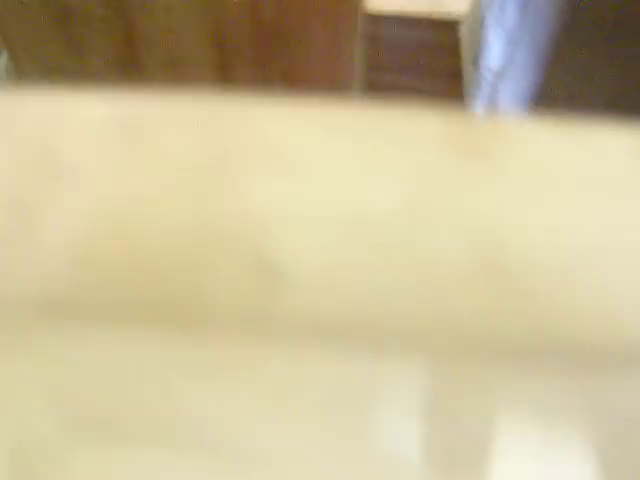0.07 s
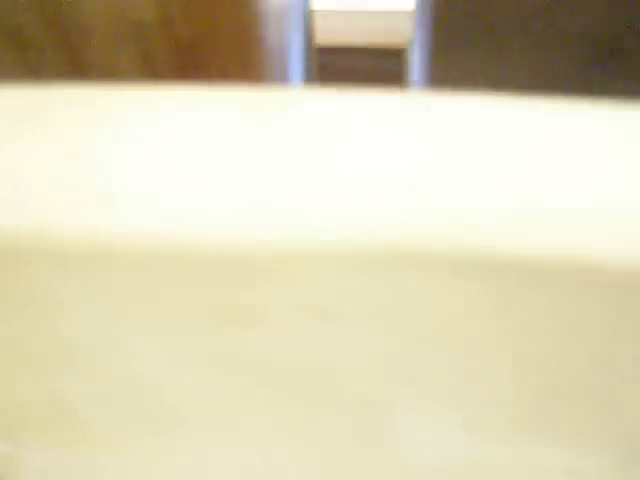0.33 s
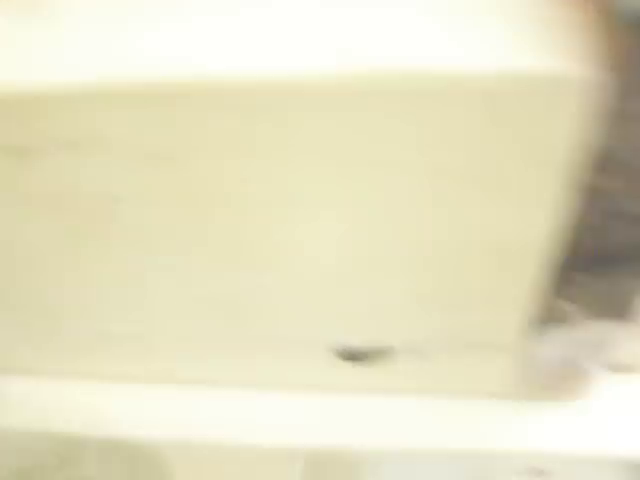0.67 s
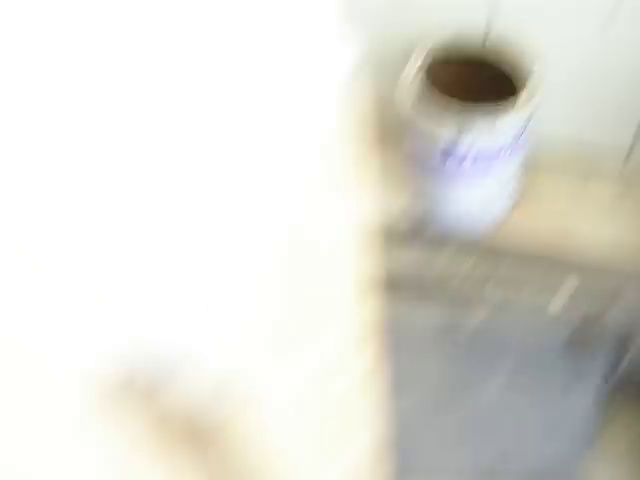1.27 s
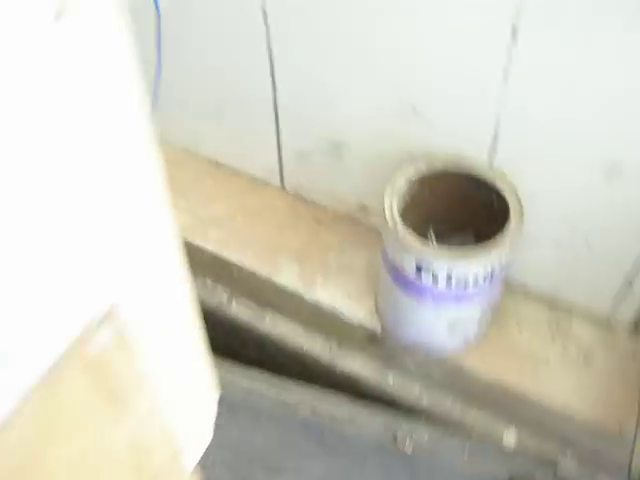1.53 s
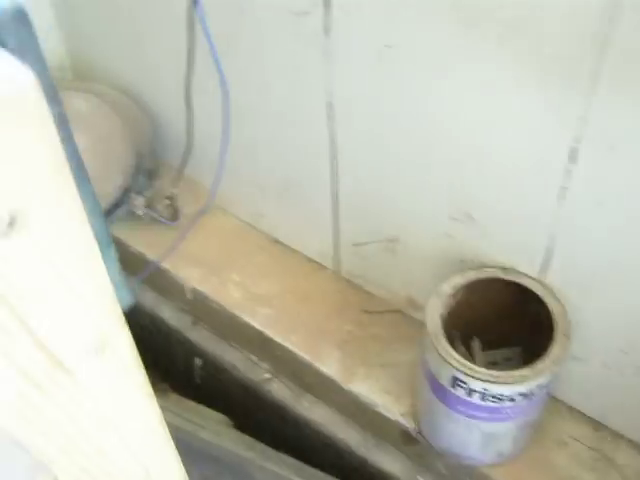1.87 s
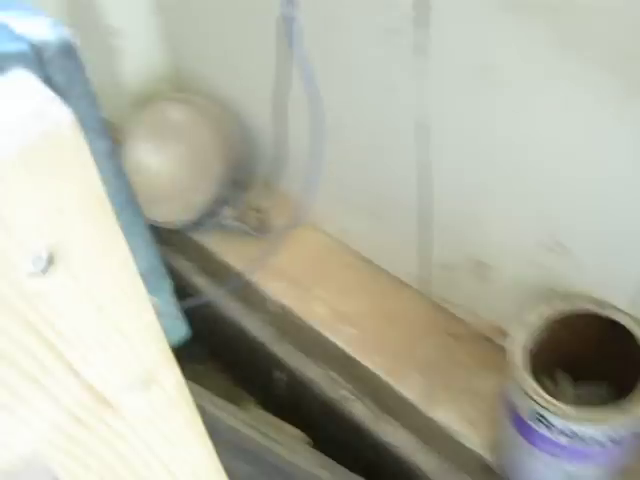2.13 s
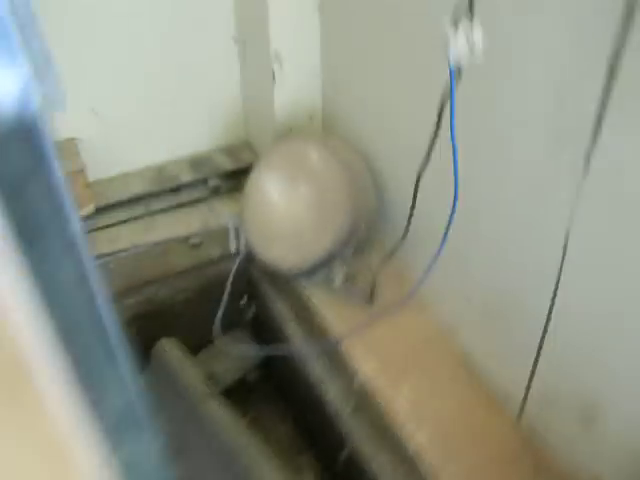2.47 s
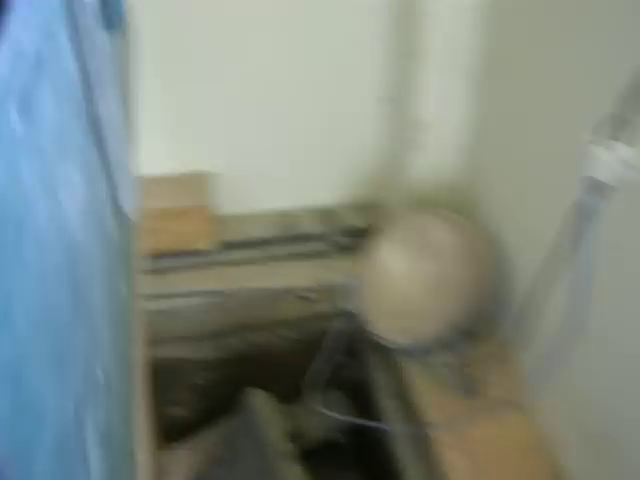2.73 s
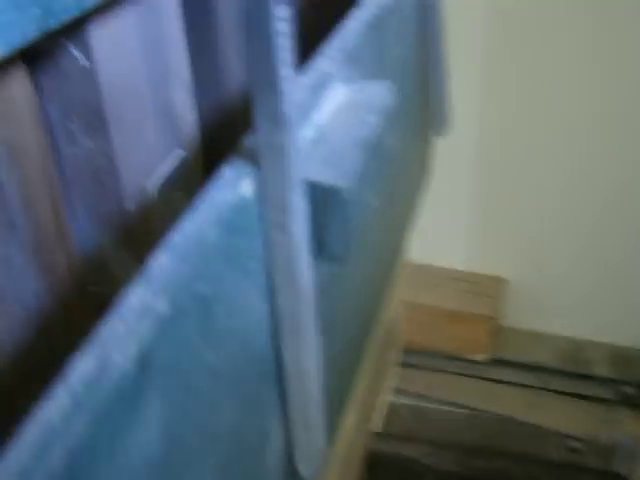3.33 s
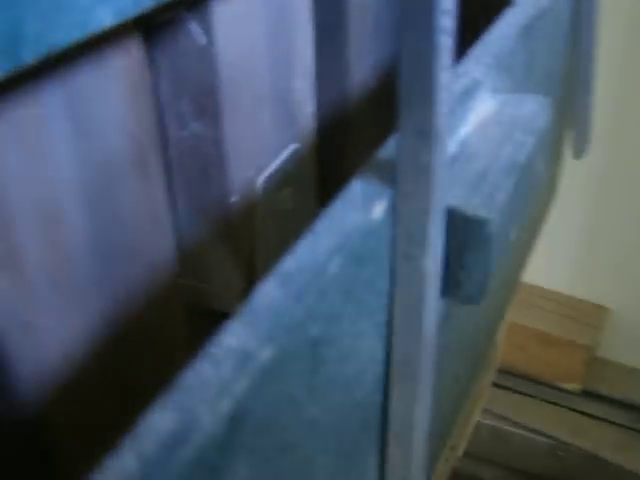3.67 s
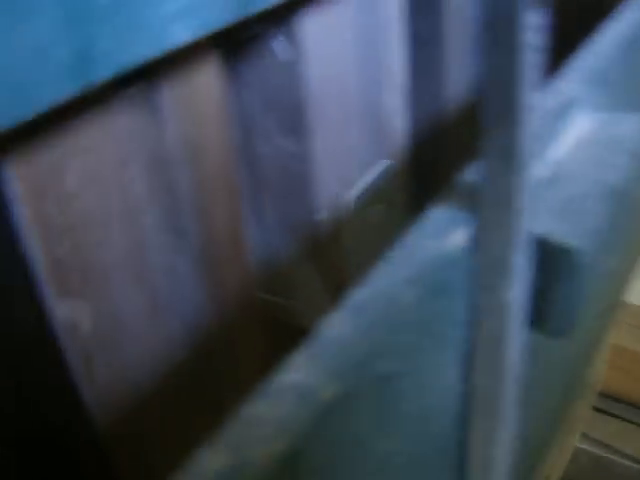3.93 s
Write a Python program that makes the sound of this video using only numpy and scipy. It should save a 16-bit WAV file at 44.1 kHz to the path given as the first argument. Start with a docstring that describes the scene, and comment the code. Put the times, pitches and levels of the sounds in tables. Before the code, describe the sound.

Running mill machinery knocks hard about twice a second over a swelling rumble and low drone. Loose parts clack, a catch snaps and a hollow part clonks. Plank walls answer briefly, and the hardest knocks overload a dull microphone.

```python
"""A small wooden room with mill machinery running. Gearing rumbles and rattles through the timber frame,
swelling with each turn; the frame drones. A wooden part knocks hard about twice a second, and loose parts clack
in between. About once a turn a catch snaps and a hollow part clonks; early on, the hollow part's clear mode
rings on at length. Plank walls answer the blows. The microphone is dull and the hardest knocks overload it."""
import sys
import numpy as np
from scipy import signal
from scipy.fft import rfft, irfft, next_fast_len
from scipy.io import wavfile
from scipy.ndimage import map_coordinates

SR = 44100
rng = np.random.default_rng(int(sys.argv[2]) if len(sys.argv) > 2 else 0)


def put_to_file(sound):
    """Save the sound as 16-bit audio at rate SR, in the file named by the first command-line argument."""
    columns = np.atleast_2d(sound).T  # one column per channel
    safe = np.clip(columns, -1, 1)
    whole_steps = np.round(safe * 32767)
    wavfile.write(sys.argv[1], SR, whole_steps.astype(np.int16))


N = 176400

# Gearing level and drone trim. Each row: time in seconds, level in dB.
GEAR_LEVEL_DB = [(0, -24), (.145, -25.5), (.18, -22), (.31, -19.5), (.39, -45.5), (.46, -29), (.53, -19.5),
                 (.70, -20), (.80, -27), (.93, -44), (1.01, -29), (1.05, -22.5), (1.27, -22.5), (1.42, -30),
                 (1.48, -21.5), (1.61, -27), (1.70, -21), (1.85, -22.5), (1.98, -25), (1.997, -36.5),
                 (2.02, -34.5), (2.05, -21.5), (2.31, -24.5), (2.41, -30), (2.46, -23.5), (2.58, -19.5),
                 (2.67, -39), (2.71, -21.5), (2.92, -26.5), (2.98, -30.5), (3.05, -25), (3.22, -19.5),
                 (3.28, -31), (3.34, -23), (3.48, -26.5), (3.62, -20.5), (3.73, -37), (3.80, -21.5),
                 (4, -32)]
DRONE_TRIM_DB = [(1.0, -3.5), (1.5, 2.5)]
# Frame resonances. Each row: centre in Hz, half-width in Hz, level in dB.
FRAME_MODES = [(85, 8.7, -47.5), (193.5, 14, -34.5), (604, 46, -38.5)]
# Catch strikes, mostly paired. Each row: start in seconds, level in dB, hold in seconds.
CATCH_STRIKES = [(0.05, -17.5, 0.0047), (1.021, -23.5, 0.003), (1.027, -12.5, 0.0016),
                 (2.026, -12.5, 0.0074), (2.031, -20.5, 0.0093), (3.086, -13.5, 0.0075),
                 (3.095, -12, 0.0016)]
# Heavy wooden blows. Each row: start in seconds, level in dB, pitch in Hz, crack trim in dB.
KNOCK_BLOWS = [(0.0571, -5, 365, -4), (0.1624, -6.5, 378, -9), (0.3534, -3, 357.6, 1.5),
               (0.4764, -7, 336, -5.5), (0.839, -1.85, 331, 2.5), (1.0318, -6.5, 390, 0.5),
               (1.3323, -2.5, 393, -1), (1.4562, -6.5, 391, -1), (1.8312, -1.95, 342, 5),
               (2.043, -7, 388, 0), (2.328, -2.6, 427.5, 2), (2.879, -4.5, 329, 3.5),
               (3.3825, -4, 371, 2.5), (3.5067, -7.5, 348, -1.5), (3.9329, -2.27, 349, 2)]
# Loose-part contact runs. Each row: start in seconds, level in dB, hold in seconds, brightness in dB.
CLACK_RUNS = [(0.158, -17, 0.0035, -2.5), (.258, -34, 0.069, 4), (1.128, -19, 0.013, -9.5),
              (1.31, -32.5, 0.026, 4), (1.699, -26, 0.0029, 7.5), (1.714, -28.5, 0.0026, 12),
              (1.778, -28, 0.063, 0.5), (2.761, -24.5, 0.0093, 0), (3.189, -24, 0.024, -5.5)]
# Hollow-part strikes. Each row: start in seconds, level in dB, hold in seconds, pitch in Hz.
HOLLOW_STRIKES = [(0.18, -17.5, 0.0032, 1090), (0.52, -16.5, 0.0042, 1076), (1.511, -18, 0.011, 1060),
                  (2.534, -13.5, 0.005, 1022), (2.559, -24.5, 0.001, 986), (2.624, -21.5, 0.001, 1034),
                  (2.814, -20, 0.00096, 1130), (3.583, -12.5, 0.0075, 977)]
# Long rings of the hollow part's mode. Each row: start in seconds, level in dB.
HOLLOW_RINGS = [(0.19, -22.5)]
# Spectra of the frame, room rush and struck parts. Each row: frequency in Hz, relative level in dB.
TIMBER_SPECTRUM = [(45, -28), (80, -12), (135, -12.5), (180, -8.5), (230, 0), (340, 5), (440, -1.5),
                   (640, 0.5), (790, -14.5), (1050, -16.5), (2500, -45.5)]
RATTLE_SPECTRUM = [(400, -22), (1000, 6), (1800, 10.5), (2500, 3), (3600, -9)]
RUSH_SPECTRUM = [(50, -26), (350, 4), (1000, -19.5), (3800, -29.5)]
WOOD_BODY_SPECTRUM = [(100, -38.5), (200, -10.5), (350, 3.5), (580, 7.5), (820, 0.5), (1400, -39.5)]
CATCH_SPECTRUM = [(500, -3), (980, 6.5), (1220, -2), (1550, 2.5), (1900, 1), (2450, -8.5), (3700, -12),
                  (4500, -35.5)]
CRACK_SPECTRUM = [(200, -18), (550, 3.5), (900, 8.5), (1500, -4.5), (2600, -7.5), (3700, -16.5)]
CLACK_SPECTRUM = [(400, -1), (1050, 6), (1280, 0), (1750, 3.5), (2050, -14), (3700, -21.5)]
HOLLOW_SPECTRUM = [(500, -6), (950, 7.5), (1900, -4.5), (3600, -24.5)]
# Room decay. Each row: frequency in Hz, T60 in seconds.
ROOM_T60_S = [(150, 0.047), (400, 0.27), (1000, 0.11), (3500, 0.015)]


def amp(db):
    """Decibels to gain."""
    return 10 ** (np.asarray(db) / 20)


def unit(x):
    """x at rms 1."""
    return x / np.sqrt(np.mean(x ** 2) + 1e-20)


def along(points, hz):
    """(Hz, value) points read on a log axis."""
    points_hz, values = np.transpose(points)
    return np.interp(np.log(hz + 1), np.log(points_hz), values)


def curve(rows):
    """(s, value) points as one value per sample."""
    return np.interp(np.arange(N) / SR, *np.transpose(rows))


def wobble(knots_per_s):
    """Smooth random curve."""
    knots = rng.standard_normal(int(N * knots_per_s / SR) + 4)
    return map_coordinates(knots, [np.arange(N) * knots_per_s / SR])


def filtered(x, response):
    """x through a gain given as a function of Hz."""
    size = next_fast_len(N + SR // 2)
    return irfft(rfft(x, size) * response(np.fft.rfftfreq(size, 1 / SR)), size)[:N]


def resonate(x, spectrum, size=4096):
    """x through a minimum-phase body of unit energy."""
    cepstrum = irfft(np.log(amp(along(spectrum, np.fft.rfftfreq(size, 1 / SR)))))
    cepstrum[1:size // 2] *= 2
    cepstrum[size // 2 + 1:] = 0
    response = irfft(np.exp(rfft(cepstrum)))
    return signal.fftconvolve(x, response / np.linalg.norm(response))[:len(x)]


def contacts(n, per_s, spread_db):
    """n samples of randomly timed impulses of scattered size."""
    impulses = (rng.random(n) < per_s / SR) * rng.choice([-1, 1], n)
    return impulses * amp(spread_db * rng.standard_normal(n))


def add(track, start_s, x):
    """Mix x into the track."""
    i = round(start_s * SR)
    track[i:i + len(x)] += x[:max(0, N - i)]


def in_room(x, room_db, wall_delay_s=0.009):
    """One blow plus a fresh noise tail from the plank walls."""
    hz, t, noise = signal.stft(rng.standard_normal(SR // 4), SR, nperseg=256)
    decay = amp(-60 * t / along(ROOM_T60_S, hz)[:, None])
    tail = signal.istft(noise * decay, SR, nperseg=256)[1]
    wet = signal.fftconvolve(x, np.pad(tail, (round(wall_delay_s * SR), 0)))
    wet *= amp(room_db) * np.linalg.norm(x) / np.linalg.norm(wet)
    return wet + np.pad(x, (0, len(wet) - len(x)))


def gearing(rumble_db=-1, rattle_db=-23, rattle_follow=0.74, flutter_db=7.5):
    """Dense bumps rumble through the frame; finer ticks rattle along."""
    level_db = curve(GEAR_LEVEL_DB)
    swell_db = level_db - level_db.mean()
    rumble = unit(resonate(contacts(N, per_s=600, spread_db=2), TIMBER_SPECTRUM))
    rattle = unit(resonate(contacts(N, per_s=1000, spread_db=-0.5), RATTLE_SPECTRUM))
    rumble *= amp(rumble_db + swell_db)
    rattle *= amp(rattle_db + rattle_follow * swell_db + flutter_db * wobble(knots_per_s=27))
    return amp(level_db.mean()) * (rumble + rattle)


def frame_drone(gear_follow=0.55):
    """Noise-driven frame resonances loosely follow the gearing's swell."""
    drone = np.zeros(N)
    for centre_hz, half_width_hz, db in FRAME_MODES:
        noise = rng.standard_normal(N)
        band = filtered(noise, lambda hz: 1 / (1 + ((hz - centre_hz) / half_width_hz) ** 2))
        drone += amp(db) * unit(band)
    gear_db = curve(GEAR_LEVEL_DB)
    return amp(gear_follow * (gear_db - gear_db.mean()) + curve(DRONE_TRIM_DB)) * drone


def room_rush(level_db=-38):
    """Soft, steady noise fills the room."""
    rush = filtered(rng.standard_normal(N), lambda hz: amp(along(RUSH_SPECTRUM, hz)))
    return amp(level_db) * unit(rush)


def chatter(hold_s, edge_spectrum, edge_db, first_tap, body_db=-0.5, t60_s=0.042):
    """A blow and quick contacts, held then fading, sound the wooden body and the part's edge."""
    t = np.arange(SR // 8) / SR
    force = amp(-60 * np.maximum(t - hold_s, 0) / t60_s)
    taps = force * contacts(len(t), per_s=850, spread_db=1)
    taps[0] = first_tap
    body = amp(body_db) * unit(resonate(taps, WOOD_BODY_SPECTRUM))
    edge = amp(edge_db) * unit(resonate(taps, edge_spectrum))
    force_rms = np.sqrt(np.mean(force ** 2))
    return in_room((body + edge) * force_rms, room_db=-3)


def catch_snaps():
    """A catch snaps home with a hard first contact."""
    out = np.zeros(N)
    for start_s, db, hold_s in CATCH_STRIKES:
        add(out, start_s, amp(db) * chatter(hold_s, CATCH_SPECTRUM, edge_db=-7.5, first_tap=1.4))
    return out


def wood_knocks(rise_s=0.0032, steepness=1.92):
    """Each blow swings a heavily damped wooden mode, rings the beam's upper mode and adds a crack."""
    beam_hz, beam_db, beam_t60_s = 600, -11.5, 0.05
    crack_db, crack_delay_s, crack_t60_s = -14, 0.00093, 0.034
    out, t = np.zeros(N), np.arange(SR // 6) / SR
    rise = t / rise_s
    swing = (rise * np.exp(1 - rise)) ** steepness
    beam_envelope = amp(beam_db - 60 * t / beam_t60_s) * (1 - np.exp(-rise))
    beam = beam_envelope * np.sin(2 * np.pi * beam_hz * t)
    for start_s, db, hz, trim_db in KNOCK_BLOWS:
        burst = rng.standard_normal(len(t)) * amp(-60 * t / crack_t60_s)
        delayed = np.pad(burst, (round(crack_delay_s * SR), 0))[:len(t)]
        crack = amp(crack_db + trim_db) * resonate(delayed, CRACK_SPECTRUM)
        thud = -swing * np.sin(2 * np.pi * hz * t)
        add(out, start_s, in_room(amp(db) * (thud + beam + crack), room_db=-8))
    return out


def loose_clacks():
    """Loose parts clack in quick runs of contacts."""
    out = np.zeros(N)
    for start_s, db, hold_s, bright_db in CLACK_RUNS:
        clack = chatter(hold_s, CLACK_SPECTRUM, edge_db=bright_db - 6, first_tap=0.86)
        add(out, start_s, amp(db) * clack)
    return out


def hollow_clonks(mode_db=-3, t60_s=0.04):
    """A struck hollow part chatters and rings one short mode."""
    out, t = np.zeros(N), np.arange(SR // 8) / SR
    for start_s, db, hold_s, hz in HOLLOW_STRIKES:
        mode = amp(mode_db - 60 * t / t60_s) * np.sin(2 * np.pi * hz * t)
        add(out, start_s, amp(db) * chatter(hold_s, HOLLOW_SPECTRUM, edge_db=-8.5, first_tap=1.4))
        add(out, start_s, amp(db) * mode)
    return out


def hollow_ring(pitch_hz=1084, t60_s=0.26):
    """The hollow part rings one clear mode at length."""
    out, t = np.zeros(N), np.arange(SR // 2) / SR
    for start_s, db in HOLLOW_RINGS:
        add(out, start_s, amp(db - 60 * t / t60_s) * np.sin(2 * np.pi * pitch_hz * t))
    return out


def scene():
    """The running mill, mono."""
    blows = wood_knocks() + loose_clacks() + catch_snaps() + hollow_clonks() + hollow_ring()
    return (blows + gearing() + frame_drone() + room_rush())[None]


def record(dry):
    """Dull microphone: steep treble cut, hard clip, final low-pass."""
    mic_hz, top_hz, order, clip_level = 3930, 15000, 26, 0.71
    dull = filtered(dry[0], lambda hz: 1 / np.sqrt(1 + np.minimum(hz / mic_hz, 2) ** (2 * order)))
    clipped = np.clip(dull, -clip_level, clip_level)
    return filtered(clipped, lambda hz: 1 / np.sqrt(1 + (hz / top_hz) ** (2 * order)))[None]


dry = scene()
out = record(dry)
put_to_file(out)
```